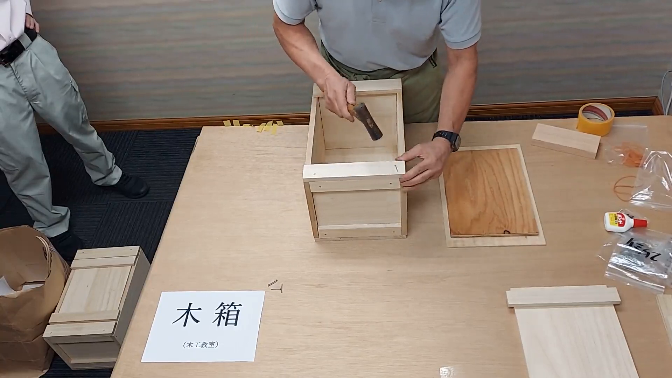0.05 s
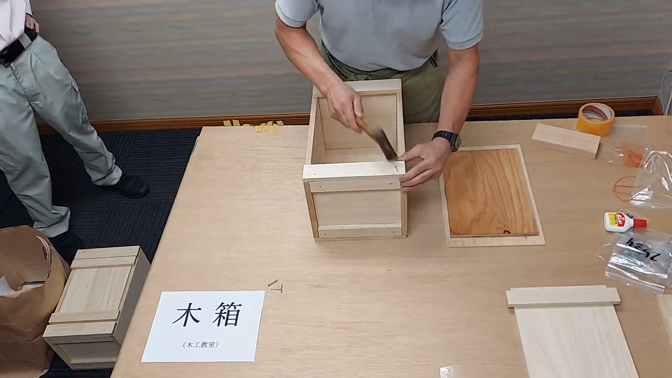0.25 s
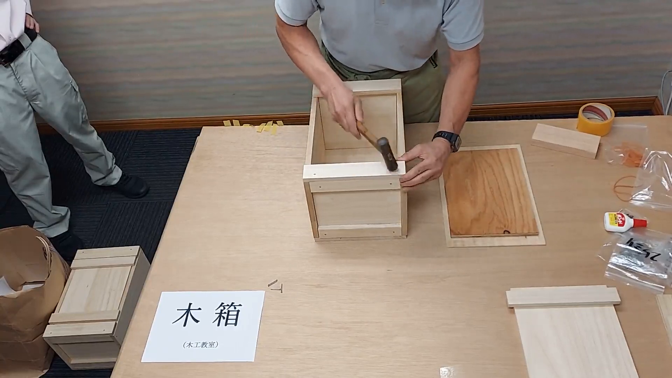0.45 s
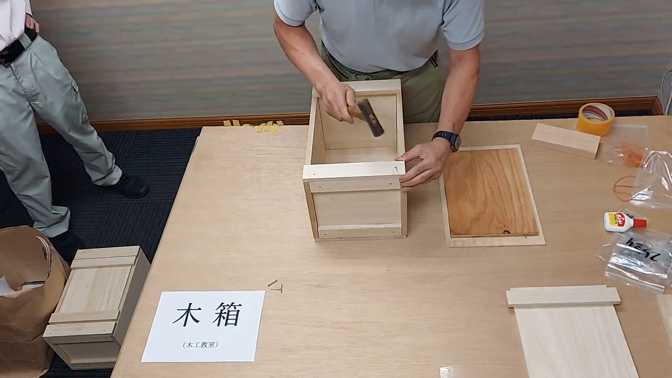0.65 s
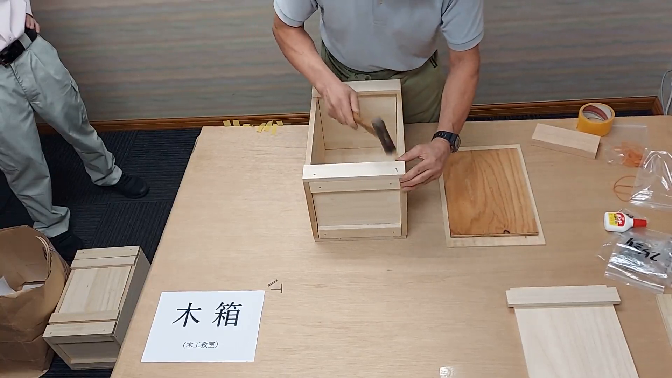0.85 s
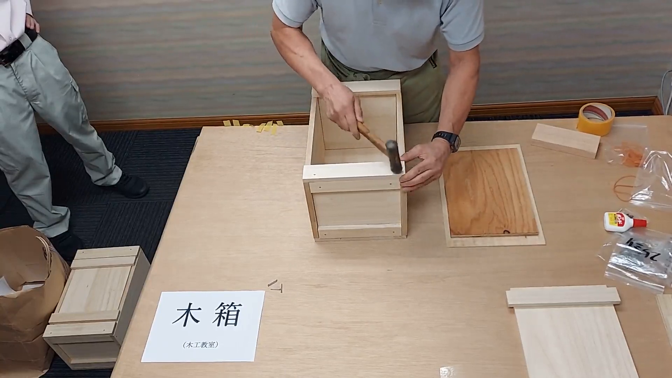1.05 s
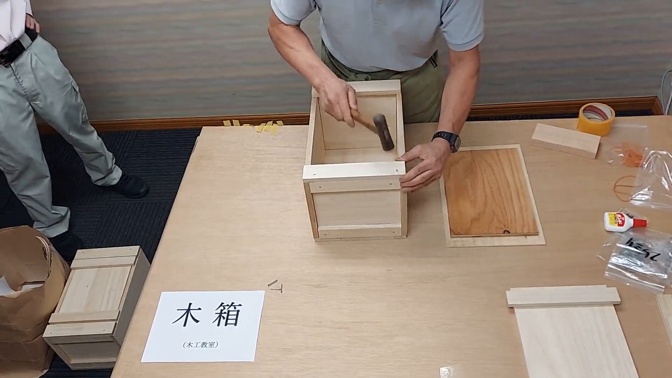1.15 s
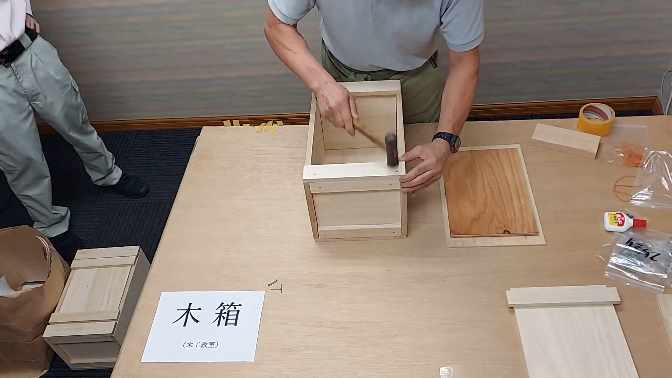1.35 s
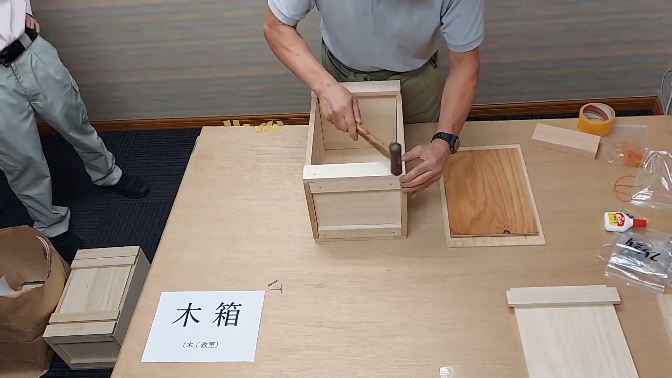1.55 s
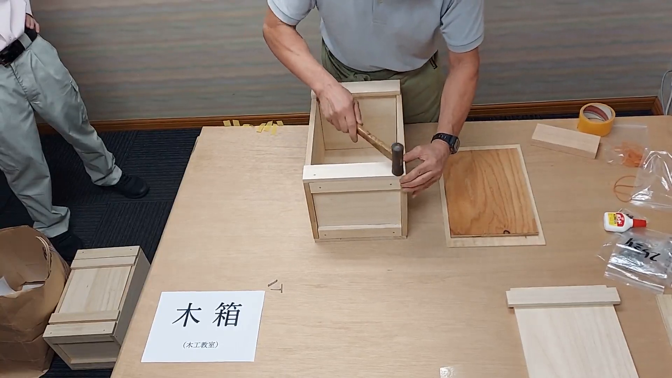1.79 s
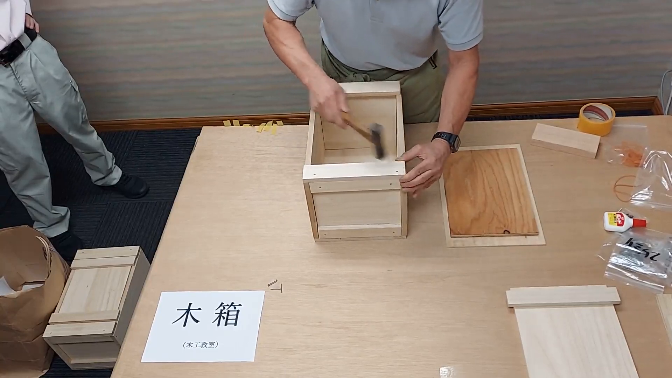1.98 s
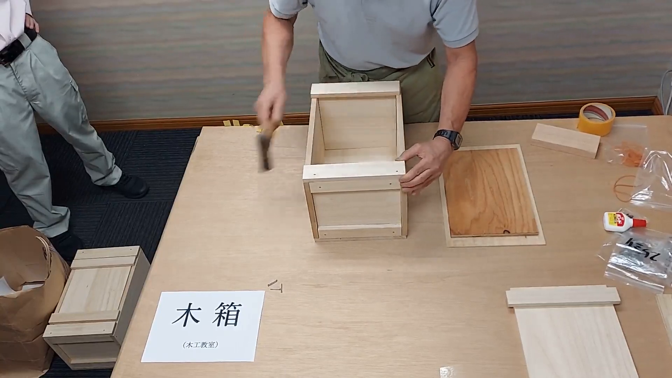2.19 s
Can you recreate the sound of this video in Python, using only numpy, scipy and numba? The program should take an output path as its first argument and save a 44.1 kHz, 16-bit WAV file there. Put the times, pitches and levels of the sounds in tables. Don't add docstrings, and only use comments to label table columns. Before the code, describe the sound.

A small hammer knocks seven times on a wooden box in a small room.

```python
import sys
import numpy as np
from scipy import signal
from scipy.fft import rfft, irfft
from scipy.io import wavfile
from scipy.ndimage import uniform_filter1d, minimum_filter1d
from numba import njit

SR = 44100
rng = np.random.default_rng(int(sys.argv[2]) if len(sys.argv) > 2 else 0)


def how_loud(loudness_db):
    steps = np.asarray(loudness_db, float) / 20
    return 10 ** steps


def master_out(mix):
    frames = np.transpose(np.atleast_2d(mix))
    ceiling = np.clip(frames, -1, 1)
    pcm = np.round(ceiling * 32767).astype(np.int16)
    wavfile.write(sys.argv[1], SR, pcm)


N = 97020
T = np.arange(N) / SR


def curve(table, hz):
    table_hz, value = np.array(table).T
    return np.interp(np.log(np.maximum(hz, 1)), np.log(table_hz), value)


def colour(x, db, causal=False):
    size = x.shape[-1]
    gain = how_loud(db(np.fft.rfftfreq(size, 1 / SR)))
    if causal:
        cepstrum = irfft(np.log(gain), size)
        fold = np.r_[1, np.full(size // 2 - 1, 2), 1, np.zeros(size - size // 2 - 1)]
        gain = np.exp(rfft(cepstrum * fold))
    return irfft(rfft(x) * gain, size)


def fade(t, t60):
    return (t >= 0) * np.exp(-np.log(1000) * np.maximum(t, 0) / max(t60, 1e-3))


def unit(x):
    return x / np.sqrt(np.mean(x ** 2))


# (frequency [Hz], level per Hz [dB])
HUM = [(25, -4.5), (60, -6.5), (416, -11.5), (1100, -18.5), (2000, -28), (2600, -31.5), (4000, -52.5),
       (16000, -53)]
# (frequency [Hz], width [Hz], level [dB])
WHISTLES = [(62.7, 15, -64), (279, 12, -77.5), (396, 25, -75.5), (880, 63, -71), (1520, 39, -73),
            (2344, 40, -73.5), (2449, 90, -78)]


def ventilation():
    hum_db, side_db, duck_db, duck_s = -63, -5, -17, 0.37
    hum = how_loud(hum_db) * unit(colour(rng.standard_normal((2, N)), lambda f: curve(HUM, f)))
    for hz, width, db in WHISTLES:
        noise = rng.standard_normal((2, N))
        whistle = colour(noise, lambda f: -10 * np.log10(1 + (2 * (f - hz) / width) ** 4))
        hum = hum + how_loud(db) * unit(whistle)
    hum = hum * np.array([[1], [how_loud(side_db)]])
    since_blow = np.maximum.reduce([fade(T - blow[0], 7 * duck_s) for blow in BLOWS])
    return hum * how_loud(duck_db * since_blow)


# (time [s], level [dB], table thud [dB], box ring [dB], crack [dB])
BLOWS = [
    (0.2311, -4.5, 3.5, -4, -2),
    (0.5321, -5.5, 5, -3.5, -1),
    (0.802, -7.5, 4, -4.5, 1),
    (1.06, -6, 2.5, -2.5, -2.5),
    (1.3153, -8.5, 6, 4.5, 0),
    (1.5807, -6, 3.5, -8, -1),
    (1.8351, -6, 0.5, 1, -1),
]
MOVED_S = 1.2
# (frequency [Hz], level [dB])
CRACK = [(150, -5.5), (500, 4), (1050, 5), (1600, -1), (2500, -1), (4800, -8.5), (7500, -13),
         (12000, -22.5)]
# (frequency [Hz], level [dB])
SECOND_PLACE = [(200, 8), (350, 11), (550, -3.5), (800, 1), (1500, 1), (5000, 0.5), (12000, 0)]


def cracks():
    tick_lead_s, tick_db, grit_t60_s, crack_level_db = 0.0015, -20, 0.016, -8.5
    places = np.zeros((2, 2, N))
    noise = rng.standard_normal(N)
    for s, db, _, _, crack_db in BLOWS:
        for lead, part_db in ((0, 0), (tick_lead_s, tick_db)):
            t = T - s + lead
            click = -1.0 * (np.abs(t) <= 0.5 / SR)
            grit = noise * fade(t, grit_t60_s)
            places[int(s > MOVED_S)] += how_loud(db + 25 + crack_db + part_db) * np.array([click, grit])
    both = places[0] + colour(places[1], lambda f: curve(SECOND_PLACE, f), causal=True)
    return how_loud(crack_level_db) * colour(both, lambda f: curve(CRACK, f), causal=True)


# (frequency [Hz], level [dB], t60 [s])
BOX_FIRST = [(268.5, -5.5, 0.12), (349.5, -13, 0.18), (384, -9, 0.087), (511, -6, 0.027), (573, -16, 0.017),
             (705, -6, 0.043), (889, -4.5, 0.052), (1051, 8, 0.016), (1109, 0, 0.032), (1230, -28, 0.01),
             (2168, -8.5, 0.0096), (2100, -17.5, 0.057), (2600, -37.5, 0.0051)]
# (frequency [Hz], level [dB], t60 [s])
BOX_SECOND = [(285, -9, 0.07), (310, -18.5, 0.15), (363.2, -5, 0.12), (443, 1, 0.13), (448, 1.5, 0.097),
              (530, -0.5, 0.1), (591, 7.5, 0.023), (679, -15, 0.017), (940, 5.5, 0.028), (1175, -9, 0.067),
              (1737, -6.5, 0.035), (2380, -1.5, 0.042), (2400, -32.5, 0.014)]
# (frequency [Hz], level [dB], t60 [s])
HEAD = [(3370, -75, 1.2)]


def ring(t, modes, chance):
    push_s, scatter_db = 0.004, 4
    total = 0
    for k, ((hz, db, t60), c) in enumerate(zip(modes, chance)):
        sign = -1 if k % 3 == 1 else 1
        total = total + sign * how_loud(db + scatter_db * c) * fade(t, t60) * np.sin(2 * np.pi * hz * t)
    return np.clip(t / push_s, 0, 1) * total


def rings():
    panels_db = -22
    out = np.zeros(N)
    for s, db, _, box_db, _ in BLOWS:
        t, chance = T - s, rng.standard_normal(13)
        box = ring(t, BOX_FIRST if s < MOVED_S else BOX_SECOND, chance)
        out += how_loud(db + 12) * (how_loud(panels_db + box_db) * box + ring(t, HEAD, chance))
    return out


# (frequency [Hz], level [dB], t60 [s])
CLACK = [(2900, -21, .006), (4950, -13.5, 0.0092), (7420, -12.5, 0.0051), (12600, -17.5, 0.0049)]


def clacks():
    lag_s = 0.000786
    out = np.zeros(N)
    for s, db, _, _, crack_db in BLOWS:
        t = T - s - lag_s
        for hz, mode_db, t60 in CLACK:
            out += how_loud(db + 7 + crack_db + mode_db) * fade(t, t60) * np.sin(2 * np.pi * hz * t)
    return out


# (frequency [Hz], t60 [s])
ROOM_T60 = [(125, 0.54), (280, 0.37), (450, 0.4), (1100, 0.33), (2900, 0.28), (7700, 0.26), (15000, 0.18)]
# (frequency [Hz], side level [dB])
ROOM_SIDE = [(125, 0.5), (250, -14), (500, -4.5), (1000, -2), (2000, -1), (4000, -0.5), (8000, 1),
             (15000, 0)]


def room(x):
    room_db, rise_s, early_db, early_t60_s = 8.5, 0.0017, -2, 0.039
    t, tail = T[:SR // 2], 0
    for hz in 90 * 2 ** np.arange(0, 7.75, 0.25):
        noise = rng.standard_normal((2, len(t)))
        band = colour(noise, lambda f: -12 * (4 * np.log2(np.maximum(f, 1) / hz)) ** 2)
        decay = fade(t, curve(ROOM_T60, hz)) + how_loud(early_db) * fade(t, early_t60_s)
        band = band * decay * (1 - np.exp(-t / rise_s))
        size = np.sqrt(hz / SR / np.sum(band ** 2, axis=1, keepdims=True))
        tail = tail + band * size * np.array([[1], [how_loud(curve(ROOM_SIDE, hz))]])
    return how_loud(room_db) * signal.fftconvolve(x[None], tail, axes=1)[:, :N]


# (frequency [Hz], level [dB], build-up [s], t60 [s])
BASS = [(55.2, -12.5, 0.024, .5), (79, -12, .03, .12), (64.7, -5.5, 0.02, 0.5), (100.6, 3, 0.021, 0.26),
        (125.7, -1, 0.015, 0.39), (171.35, 9, 0.059, 0.23), (177.4, -11.5, 0.022, 0.49),
        (230.2, -5, 0.012, 0.367)]


def thuds():
    meet_s, bass_db, side_db = 0.0445, -14, -6
    out = np.zeros((2, N))
    for s, db, thud_db, _, _ in BLOWS:
        t = T - s
        for hz, mode_db, rise, t60 in BASS:
            swell = np.sin(np.pi / 2 * np.clip(t / rise, 0, 1)) ** 2
            size = how_loud(db + bass_db + thud_db + mode_db) * fade(t, t60) * swell
            turn = 2 * np.pi * hz * (t - meet_s)
            out += size * np.array([np.cos(turn), how_loud(side_db) * np.sin(turn) * 64 / hz])
    return out


def scene():
    direct_db, grit_db, ring_db = -15, -8.5, 6.5
    grit_send_db, ring_send_db = -28, -16
    snap_db, direct_side_db, pan_db = 12, -18, 0.93
    click, grit = cracks()
    ringing = rings()
    snap = colour(click + how_loud(grit_db) * grit, lambda f: snap_db * np.clip(f / 4000, 0, 1), causal=True)
    near = how_loud(direct_db) * snap + clacks() + how_loud(ring_db) * ringing
    late = np.concatenate([np.zeros(3), near[:-3]])
    direct = np.array([near, how_loud(direct_side_db) * (near - late)])
    sent = click + how_loud(grit_send_db) * grit + how_loud(ring_send_db) * ringing
    mid, side = direct + room(sent) + thuds() + ventilation()
    return np.array([how_loud(pan_db / 2) * (mid + side), how_loud(-pan_db / 2) * (mid - side)])


@njit
def recover(gain, step):
    out, g = np.empty(len(gain)), 1.
    for i in range(len(gain)):
        g = min(gain[i], g + (1 - g) * step)
        out[i] = g
    return out


def top_cut(x):
    return signal.sosfilt(signal.butter(12, 16880, fs=SR, output="sos"), x)


def record(dry):
    limit_db, ratio, ahead_s, release_s = -5, 3, 0.0064, 0.024
    top_hz, low_hz = 15000, 38
    peak = np.abs(dry).max(axis=0) + 1e-9
    want = np.minimum(1, (how_loud(limit_db) / peak) ** (1 - 1 / ratio))
    k = int(ahead_s * SR)
    ahead = minimum_filter1d(want, 2 * k + 1)
    gain = uniform_filter1d(recover(ahead, 1 / (release_s * SR)), k // 4)
    soft = np.tanh(dry * gain * how_loud(2.5) / 1.12) * 1.282

    def response(f):
        treble_cut = -30 * np.clip((f - top_hz) / 1200, 0, 1.5)
        return treble_cut - 10 * np.log10(1 + (low_hz / (f + 1)) ** 4)

    return top_cut(colour(soft, response))


dry = scene()
out = record(dry)
master_out(out)
```